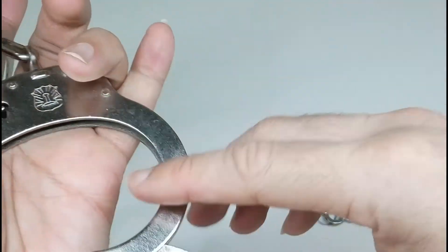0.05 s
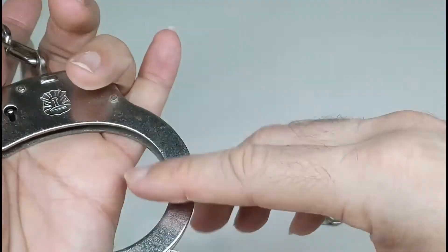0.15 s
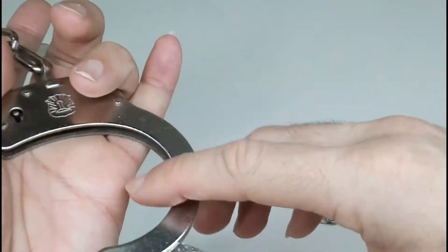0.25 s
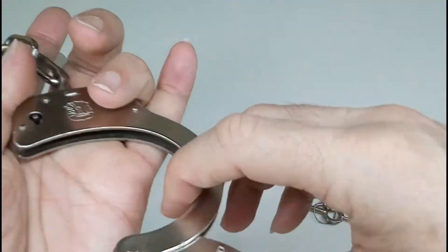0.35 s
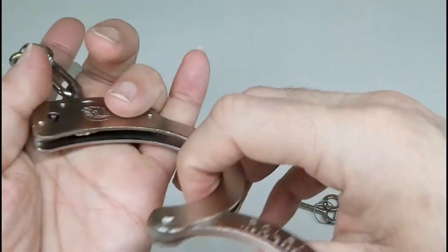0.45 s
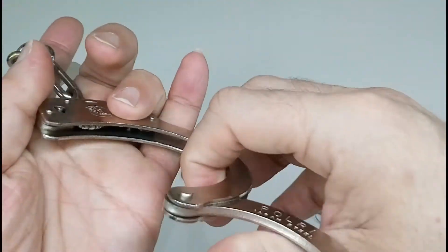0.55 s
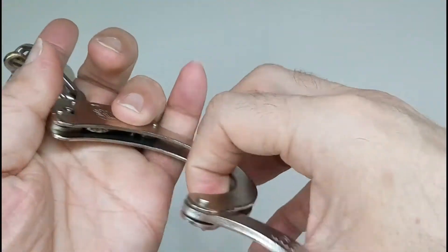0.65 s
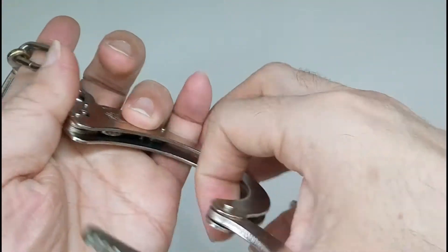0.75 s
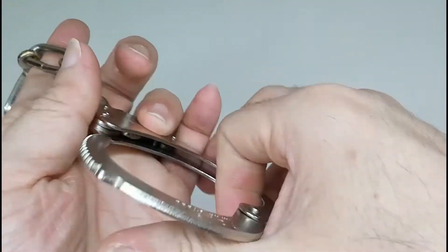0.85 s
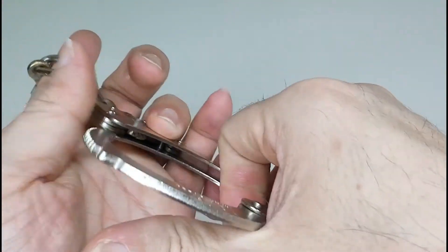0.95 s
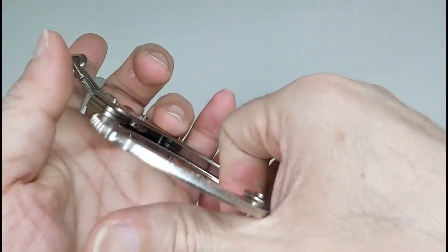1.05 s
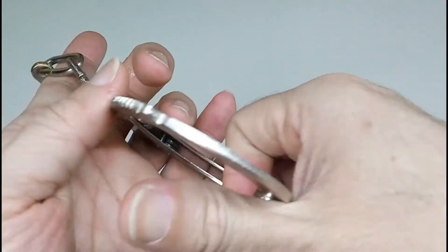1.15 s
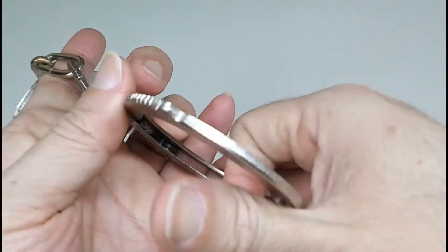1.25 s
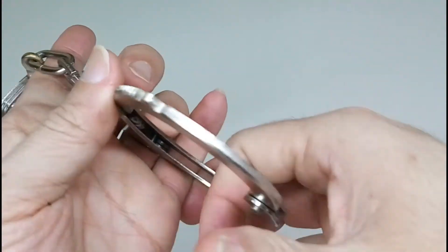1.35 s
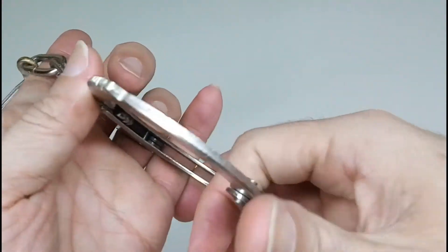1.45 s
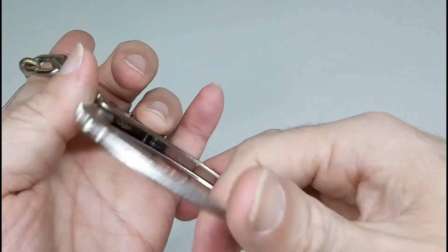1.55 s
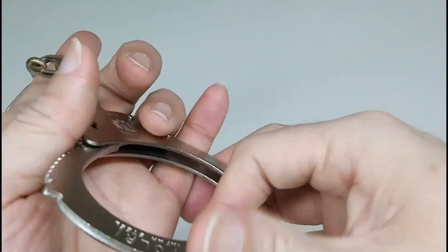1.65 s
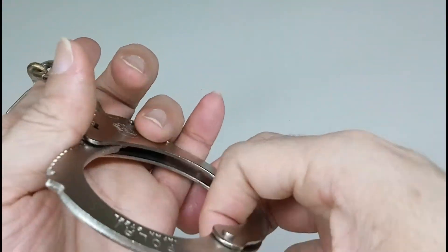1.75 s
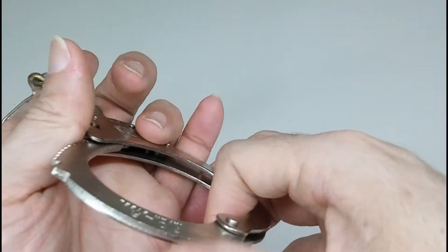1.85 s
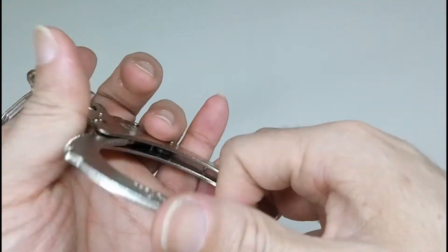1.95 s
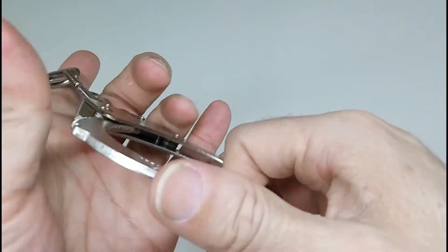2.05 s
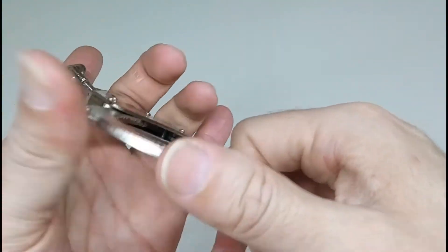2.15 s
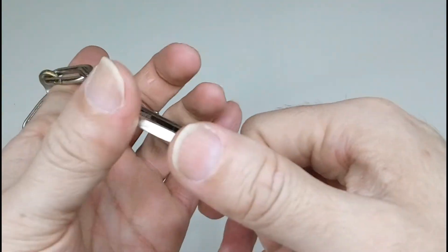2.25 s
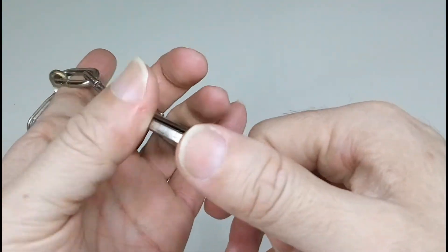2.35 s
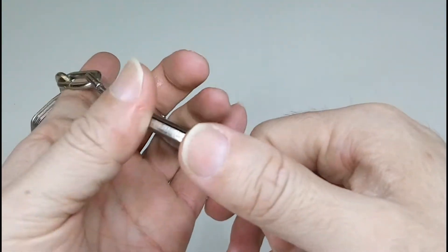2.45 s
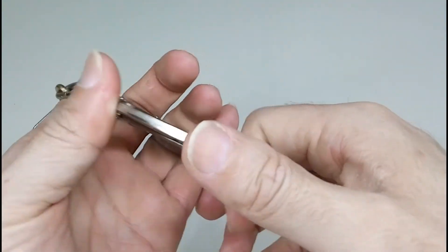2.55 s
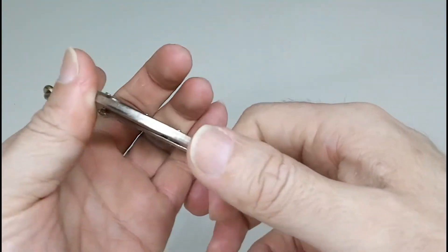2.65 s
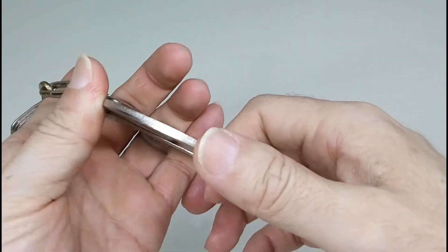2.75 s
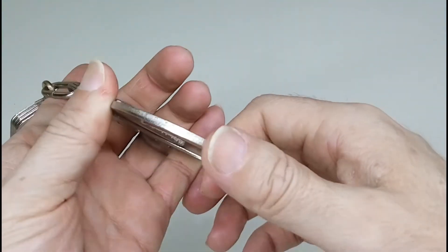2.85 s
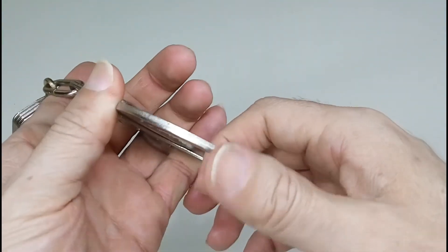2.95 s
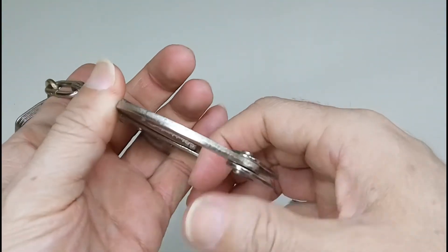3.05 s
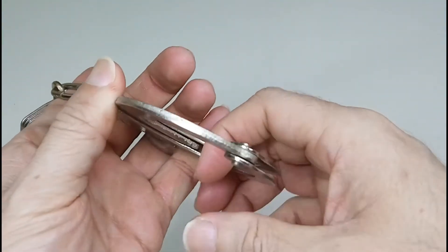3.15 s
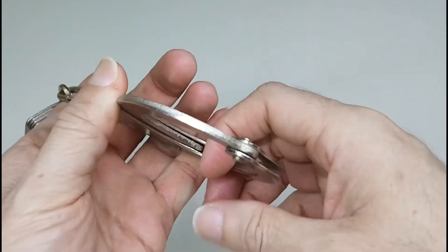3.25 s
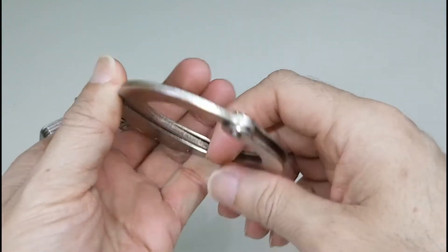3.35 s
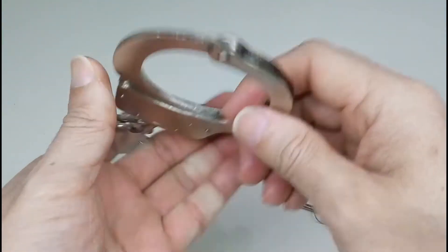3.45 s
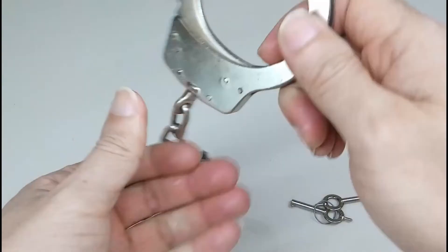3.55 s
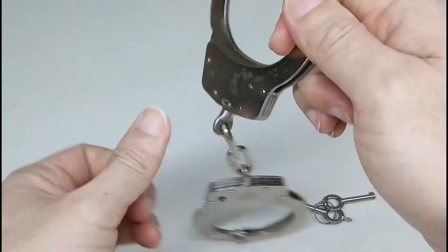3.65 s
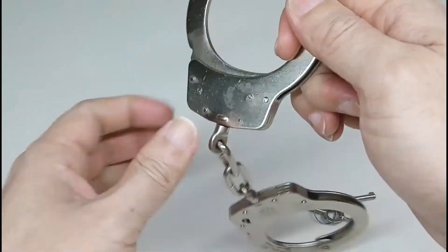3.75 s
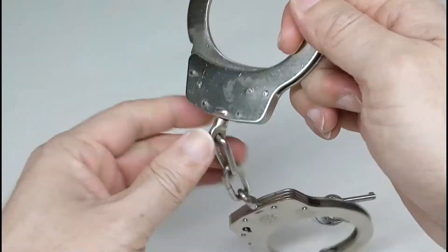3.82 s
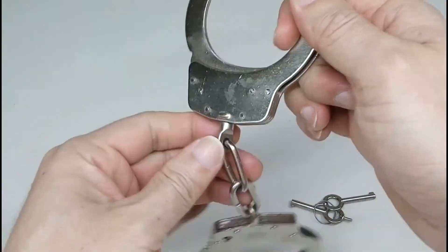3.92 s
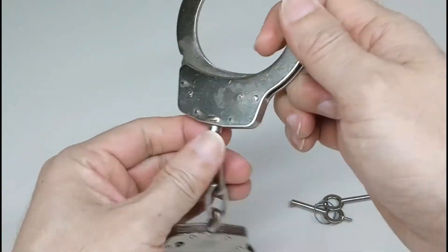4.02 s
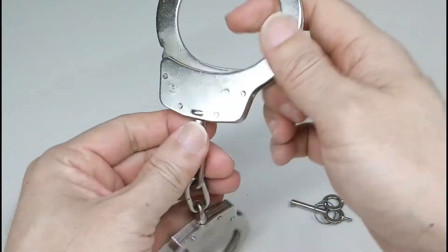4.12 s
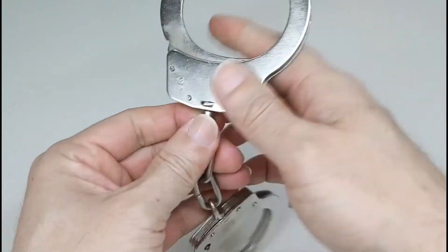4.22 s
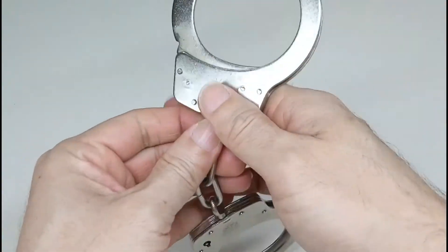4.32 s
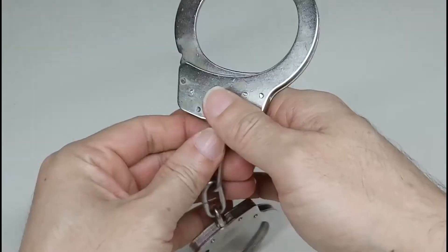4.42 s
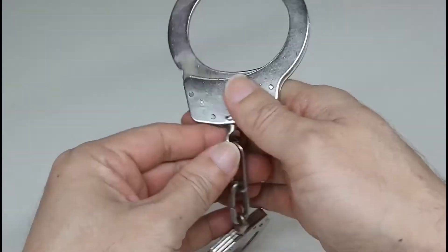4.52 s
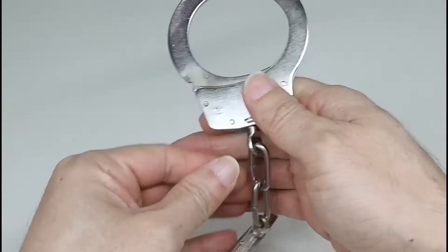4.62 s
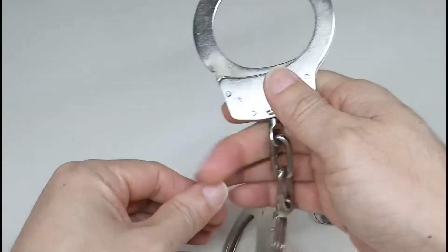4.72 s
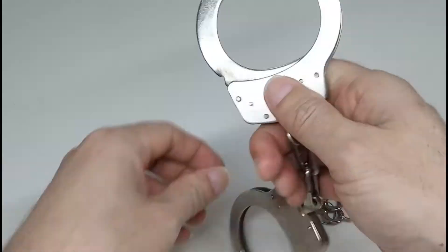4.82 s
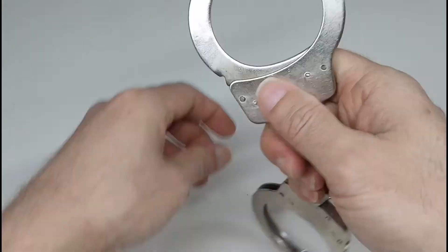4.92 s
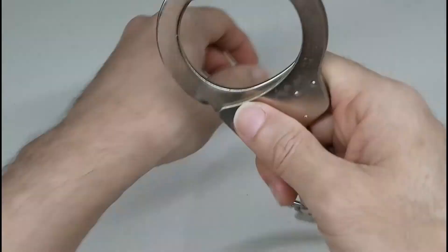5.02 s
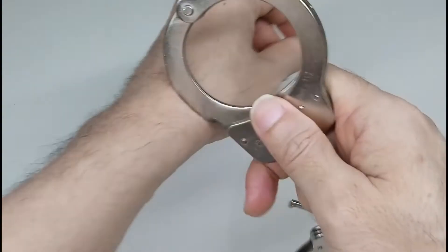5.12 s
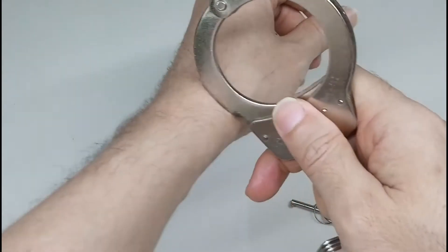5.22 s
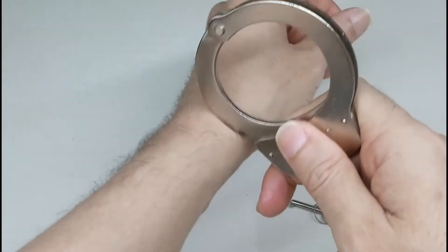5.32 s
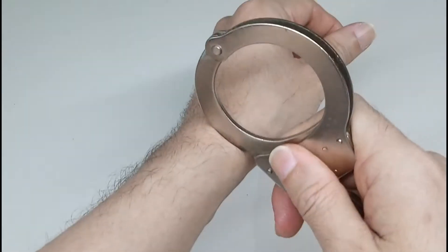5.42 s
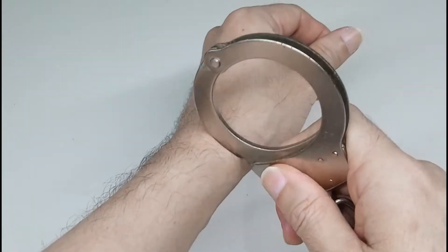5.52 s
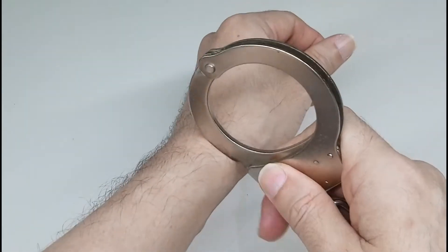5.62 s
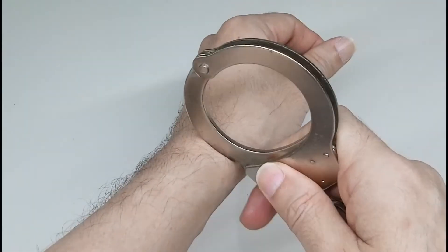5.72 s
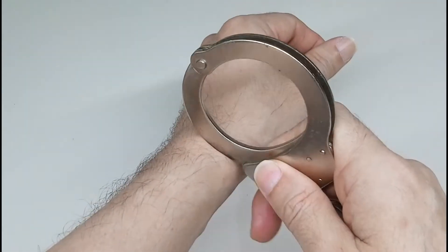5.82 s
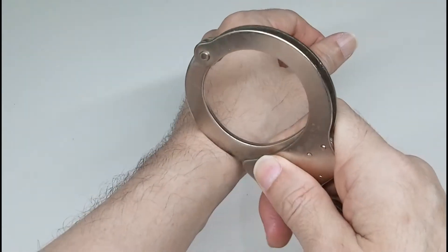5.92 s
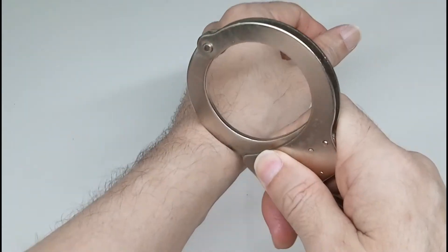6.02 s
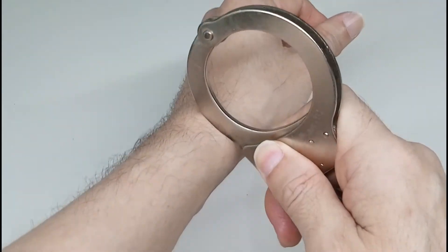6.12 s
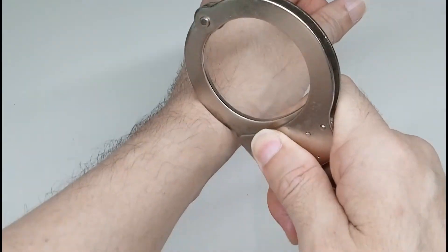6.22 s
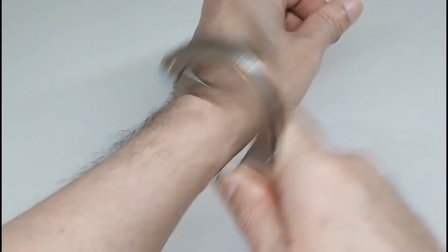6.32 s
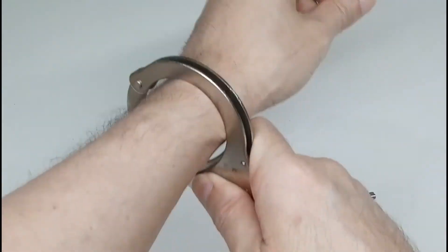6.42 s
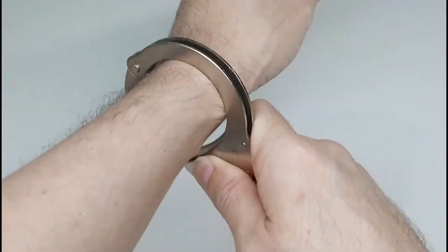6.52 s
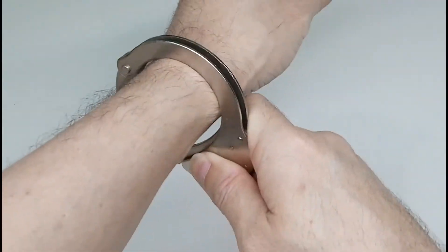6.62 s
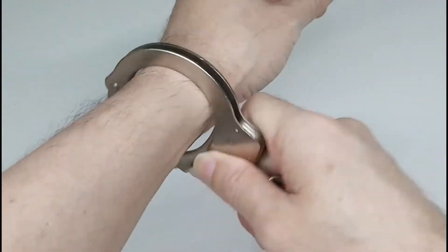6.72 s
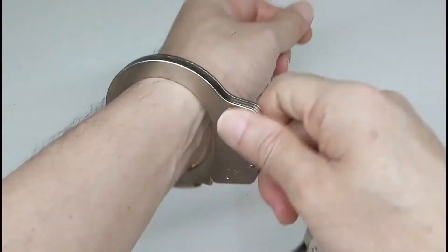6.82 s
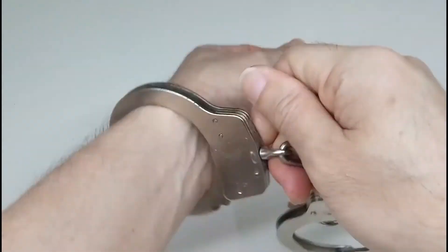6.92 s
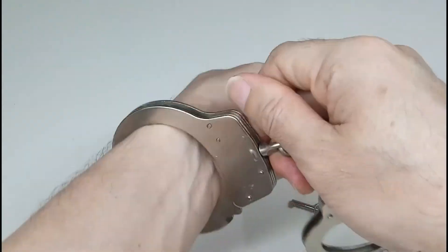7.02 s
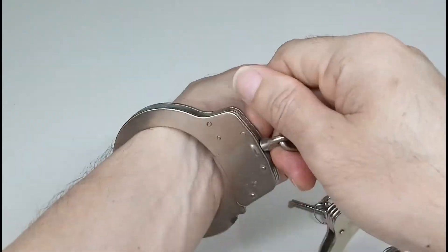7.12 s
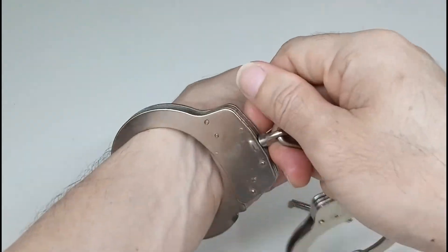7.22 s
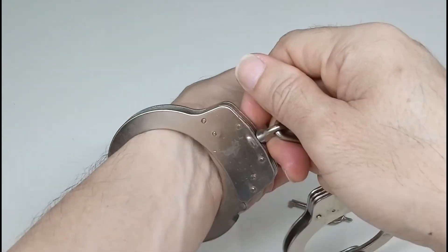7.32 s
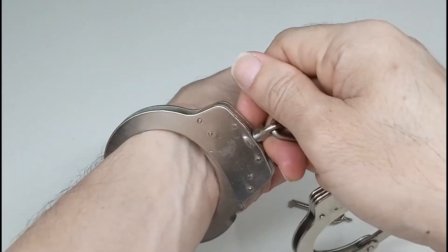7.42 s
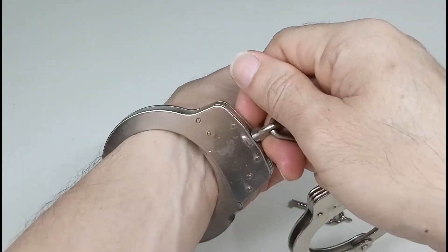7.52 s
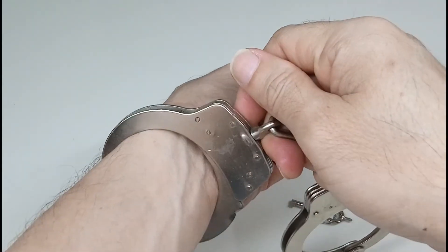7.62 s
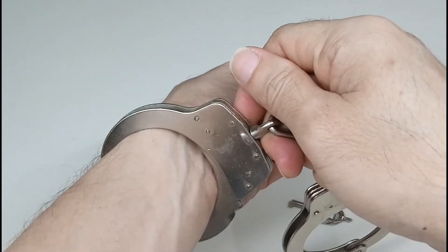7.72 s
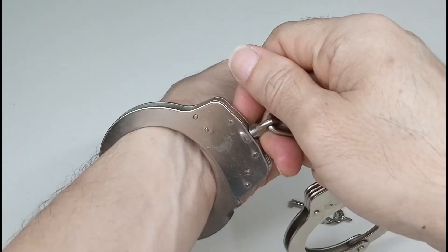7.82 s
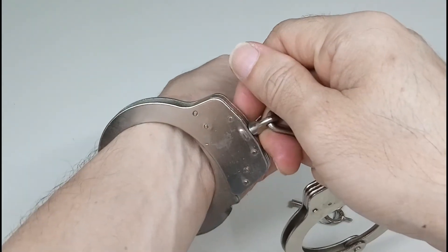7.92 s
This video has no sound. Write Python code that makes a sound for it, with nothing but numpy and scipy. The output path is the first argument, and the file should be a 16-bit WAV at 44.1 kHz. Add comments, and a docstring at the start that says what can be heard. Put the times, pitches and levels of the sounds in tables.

```python
"""Handcuffs over a table

A small room, the microphone close to a pair of steel handcuffs. The bow taps and scrapes,
then is pushed through the ratchet tooth by tooth. The chain clinks, and the bow swings
round a wrist and snaps shut. Each contact is a crack of noise plus the ring of steel modes.
Hands bump softly over steady fan noise and mains hum."""
import sys
import numpy as np
from scipy import signal
from scipy.fft import rfft, irfft
from scipy.io import wavfile

SR = 44100
rng = np.random.default_rng(int(sys.argv[2]) if len(sys.argv) > 2 else 0)


def master_out(mix):
    """Clip the mix to full scale and print it as 16-bit PCM to the path in sys.argv[1]."""
    frames = np.transpose(np.atleast_2d(mix))
    ceiling = np.clip(frames, -1, 1)
    pcm = np.round(ceiling * 32767).astype(np.int16)
    wavfile.write(sys.argv[1], SR, pcm)


N = 351477
BLOW_SPAN = .005 * SR  # a blow's level is its energy spread over 5 ms

# The cuff closing: the bow runs through the ratchet, swings round the wrist and latches.
# start_s, level_db, first_spot_hz, last_spot_hz, lift_db, tilt_db_per_octave, ring_db,
# grind_s, first_gap_s, step_db_per_contact, thud_db
CLOSING_KNOCKS = [(6.3431, -20, 5300, 4200, 1.5, -1.8, -10, 0.0029, .005, 0.6, -48),
                  (6.39, -18.5, 3770, 3790, 15, -4.5, -17, 0.00077, .0063, -3.4, -38),
                  (6.4257, -19, 2320, 3670, 10, -3.5, -10, 0.0005, .002, 1.25, -46)]


def undb(db):
    """Decibels to gain."""
    return 10 ** (np.asarray(db) / 20)


def level(x, db, span=None):
    """Scale x as if its energy, spread over span samples, had this rms level."""
    return x * undb(db) / np.sqrt(np.sum(x ** 2) / (span or len(x)))


def clock(seconds):
    """Time axis of a short sound."""
    return np.arange(int(seconds * SR)) / SR


def add(track, start_s, x):
    """Mix x into the track."""
    i = max(int(start_s * SR), 0)
    track[i:i + len(x)] += x[:N - i]


def fade(t, t60):
    """Free decay, 60 dB down after t60."""
    return np.exp(-np.log(1000) * t / t60)


def curve(points, f):
    """Gain in dB of a (Hz, dB) spectrum at the frequencies f."""
    hz, db = np.transpose(points)
    return np.interp(np.log(f), np.log(hz), db)


def treble_octaves(f):
    """Octaves above 1.5 kHz, zero below."""
    return np.log2(np.maximum(f / 1500, 1))


def colour(x, db_at, size=512):
    """Minimum-phase filter with the gain db_at(f), size samples long."""
    f = np.maximum(np.arange(size // 2 + 1) * SR / size, 1)
    cepstrum = irfft(np.log(undb(db_at(f))))
    cepstrum[1:size // 2] *= 2
    cepstrum[size // 2 + 1:] = 0
    return signal.oaconvolve(x, irfft(np.exp(rfft(cepstrum))))[:len(x)]


def fan_and_hum(waver=0.3):
    """Room tone: steady fan noise under a wavering mains hum and fan tone."""
    # Spectral shape of the fan and room air: frequency_hz, gain_db
    air_spectrum = [(20, -20), (40, -8), (62, 0), (100, 0), (140, -4.5), (205, 0), (245, -6), (480, -5),
                    (640, -7), (820, -6.5), (960, -11), (2000, -18), (3500, -24), (6500, -29), (8500, -35),
                    (16000, -37.5)]
    # Mains hum and fan tone: pitch_hz, level_db
    tones = [(99.9, -59.5), (285, -65)]
    t = np.arange(N) / SR
    out = level(colour(rng.standard_normal(N), lambda f: curve(air_spectrum, f), size=8192), db=-51.5)
    knots_s = np.linspace(0, t[-1], 40)
    for hz, db in tones:
        swell, drift = (np.interp(t, knots_s, row) for row in rng.standard_normal((2, len(knots_s))))
        out += np.sqrt(2) * undb(db) * (1 + waver * swell) * np.sin(2 * np.pi * hz * t + drift)
    return out


def thuds(width_octaves=0.53, slap_equal_db=-29):
    """Flesh pushes slowly: hand bumps and cushioned knocks swell and die in a few cycles."""
    # Soft bumps of hands and table: start_s, level_db, pitch_hz, length_s
    bumps = [(.01, -48, 68.5, .079), (3.017, -53, 66, 0.19), (3.413, -58, 85, .05),
             (3.609, -49.5, 92, 0.062), (4.189, -52, 60, 0.039), (4.25, -42, 93, .035),
             (4.295, -48.5, 105, .078), (4.379, -50, 64.5, 0.075), (4.961, -34, 78, .062)]
    # Dull body of a closing knock: pitch_hz, gain_db, length_s
    knock_body = [(199, 0.5, 0.017), (410, -1.5, 0.02), (880, -2.5, 0.028)]
    # each bump has a higher, shorter slap that grows with the square of the force
    slaps = [(start, 2 * db - slap_equal_db, hz * 1.96, length * .7) for start, db, hz, length in bumps]
    bodies = [(start, thud_db + db, hz, length)
              for start, *_, thud_db in CLOSING_KNOCKS for hz, db, length in knock_body]
    out, t = np.zeros(N), clock(.5)
    for start, db, hz, length in bumps + slaps + bodies:
        band = lambda f: -14 * np.log10(1 + (np.log2(f / hz) / width_octaves) ** 4)
        rumble = colour(rng.standard_normal(SR), band, size=4096)[-len(t):]
        envelope = t * np.exp(-4 * t / length)
        add(out, start, level(rumble * envelope, db, length * SR))
    return out


def crack(spot_hz, lift_db, tilt_db, grind_s, t60, spot_width, snap_db=3, snap_t60=0.0018):
    """Steel shakes crowded modes that the fingers damp at once; the struck spot rings above the rest."""
    # Spectrum of steel on steel: frequency_hz, gain_db
    steel = [(200, -21.5), (800, -19.5), (1300, -18), (1800, -9.5), (2700, -3), (3900, 2), (5400, 1),
             (7000, -5), (8400, -6.5), (9200, -6), (11500, -7.5), (13000, -11), (14700, -14.5),
             (15500, -6.5)]
    t = clock(1 / 16)
    decay = fade(t, t60) + undb(snap_db) * fade(t, snap_t60)
    attack = 1 - np.exp(-t / grind_s)  # a slow, grinding contact swallows the first snap
    burst = attack * decay * rng.standard_normal(len(t))
    spot = lambda f: lift_db / (1 + (np.log(f / spot_hz) / spot_width) ** 2)
    return colour(burst, lambda f: curve(steel, f) + spot(f) + tilt_db * treble_octaves(f))


def rings(modes, count, split=0.00318):
    """One ring a blow: riveted plates split every mode into a close pair that each blow mixes anew."""
    t = clock(.4)
    hz, db, t60 = np.repeat(modes, 2, axis=0).T[:, :, None]
    hz = hz * (1 + split * np.resize([-1, 1], hz.shape))
    angle = 2 * np.pi * hz * t
    envelope = undb(db) * fade(t, t60)
    phase = 2 * np.pi * rng.random((count, len(hz)))
    return np.cos(phase) @ (envelope * np.sin(angle)) + np.sin(phase) @ (envelope * np.cos(angle))


def strikes(blows, modes, crack_t60, spot_width):
    """Each blow cracks and sets the modes ringing; a harder contact favours the high modes."""
    out = np.zeros(N)
    for blow, ring in zip(blows, rings(modes, len(blows))):
        start, db, spot_hz, lift_db, tilt_db, ring_db, grind_s = blow  # tilt is per octave
        contact = crack(spot_hz, lift_db, tilt_db, grind_s, crack_t60, spot_width)
        ring = colour(ring, lambda f: 1.1 * tilt_db * treble_octaves(f))
        add(out, start, level(contact, db, BLOW_SPAN))
        add(out, start, level(ring, db + ring_db, BLOW_SPAN))
    return out


def bow_taps(lift_db=10.5, ring_db=-18):
    """The bow taps the frame as the cuff is turned, and the side plates clack hollowly with it."""
    # Taps: start_s, level_db, spot_hz, tilt_db_per_octave, plate_db
    taps = [(.7597, -56, 6100, -5, -12), (.804, -52.5, 6000, -6, -8), (0.8689, -32.5, 8700, -0.5, 1),
            (0.875, -38, 4900, 4, -10), (1.24, -46.5, 5200, -1, -4.5), (1.276, -54, 5740, -1, -12),
            (1.5817, -46.5, 5160, 0.5, -12), (1.6349, -42.5, 5240, 0, -6.5), (6.81, -59, 4500, -3, -12),
            (6.956, -52, 4640, -3.5, -14)]
    plate_hz, plate_lift_db, plate_tilt_db, plate_ring_db = 1690, 13.5, -6, -33
    blows = []
    for start, db, spot_hz, tilt_db, plate_db in taps:
        grind_s = 0.0009 * undb(-50 - db)  # harder taps bite sooner
        blows += [(start, db, spot_hz, lift_db, tilt_db, ring_db, grind_s),
                  (start, db + plate_db, plate_hz, plate_lift_db, plate_tilt_db, plate_ring_db, grind_s)]
    return blows


def bow_scrapes(pawl_hz=5170, width_hz=380, grain_db=6):
    """Tiny uneven slips of steel on steel ring the pawl."""
    # The bow sliding over the pawl: start_s, length_s, level_db
    slides = [(1.584, 0.052, -55.5), (2.317, 0.031, -58.5)]
    pawl_band = lambda f: -10 * np.log10(1 + ((f - pawl_hz) / width_hz) ** 4)
    out = np.zeros(N)
    for start, length, db in slides:
        n = int(length * SR)
        noise, roughness = rng.standard_normal((2, SR))[:, :n]
        slips = noise * undb(grain_db * roughness) * signal.windows.tukey(n)
        add(out, start, level(colour(slips, pawl_band), db))
    return out


def ratchet(tilt_db=0, ring_db=-30):
    """At every tooth the pawl slips off the tip and drops into the notch: a double click."""
    # Ratchet teeth, the first two in one push: start_s, level_db, tip_hz, pawl_hz, lift_db, drop_s
    teeth = [(2.3631, -21, 2640, 5040, 12.5, .0055), (2.3745, -22.5, 5200, 5100, 13, .007),
             (2.733, -21, 4530, 4600, 10, .007), (2.8311, -22, 3800, 5040, 7, .0064),
             (2.979, -22.5, 4600, 5380, 6, 0.01)]
    slip_db, slip_lift_db = -2, 6.5
    slip_grind_s, landing_grind_s = 0.00077, 0.00082
    blows = []
    for start, db, tip_hz, pawl_hz, lift_db, drop_s in teeth:
        blows += [(start, db + slip_db, tip_hz, slip_lift_db, tilt_db, ring_db, slip_grind_s),
                  (start + drop_s, db, pawl_hz, lift_db, tilt_db, ring_db, landing_grind_s)]
    return blows


def pawl_spring(blows, spring_db=-10, reach_hz=330):
    """Blows that land near the pitch of the pawl spring leave it singing."""
    # Modes of the spring: pitch_hz, gain_db, t60_s
    spring_modes = [(4670, -9, .2), (4920, -3.5, 0.13), (5030, 1, 0.18), (5170, -.5, 0.16),
                    (5600, -12, .25), (11450, -10, .21), (15100, -15, .16)]
    strongest_hz = spring_modes[2][0]
    out = np.zeros(N)
    for (start, db, spot_hz, *_), ring in zip(blows, rings(spring_modes, len(blows))):
        coupling = 1 / (1 + ((spot_hz - strongest_hz) / reach_hz) ** 2)
        add(out, start, coupling * level(ring, db + spring_db, BLOW_SPAN))
    return out


def chain_clinks(tilt_db=-7, ring_db=-8.5, grind_s=0.00037):
    """Each link hits its neighbour once, short and clean; small free links ring in a narrow band."""
    # Links knocking together: start_s, level_db, spot_hz, lift_db
    clinks = [(3.7031, -56.5, 3980, 9), (3.8988, -53.5, 4870, 14), (3.995, -58.5, 5000, 2),
              (4.194, -58.5, 3000, 4), (4.4753, -45, 3970, 7), (4.5977, -46.5, 4020, 16),
              (4.82, -39, 4200, 21.5), (5.738, -57.5, 4200, 8)]
    # Modes of the hanging chain and second cuff: pitch_hz, gain_db, t60_s
    chain_modes = [(2260, -12, 0.52), (2460, -18, .4), (3260, -12, 0.43), (4050, 1, .16), (4180, 3.5, .14),
                   (4500, -12, .4), (6702, -6, .3)]
    blows = [(*clink, tilt_db, ring_db, grind_s) for clink in clinks]
    return strikes(blows, chain_modes, crack_t60=0.042, spot_width=0.052)


def snap_shut(contacts=3, gap_growth=1.45, brighten_db=2):
    """The bow chatters at widening gaps, brighter each time, as the point of contact slides along it."""
    blows = []
    for knock in CLOSING_KNOCKS:
        start, db, first_hz, last_hz, lift_db, tilt_db, ring_db, grind_s, gap_s, step_db, _ = knock
        for k, spot_hz in enumerate(np.geomspace(first_hz, last_hz, contacts)):
            contact_s = start + gap_s * k ** gap_growth
            contact_tilt_db = tilt_db + k * brighten_db
            blows.append((contact_s, db + k * step_db, spot_hz, lift_db, contact_tilt_db, ring_db, grind_s))
    return blows


def room(x, table_s=.0021, wall_s=.0075, crossover_hz=7000):
    """The table and the nearest wall answer first, then a short tail whose treble dies a little sooner."""
    t = clock(.5)
    early, late = rng.standard_normal((2, len(t)))
    lows = signal.sosfilt(signal.butter(2, crossover_hz, "low", fs=SR, output="sos"), late)
    highs = signal.sosfilt(signal.butter(2, crossover_hz, "high", fs=SR, output="sos"), late)
    tail = lows * fade(t, t60=0.37) - highs * fade(t, t60=0.35)
    response = np.zeros(SR)
    add(response, table_s, undb([-10]))
    add(response, wall_s, level(early * fade(t, t60=0.052), db=-12, span=1))
    add(response, wall_s, level(tail, db=-12.5, span=0.88))
    return x + signal.fftconvolve(x, response)[:N]


def scene():
    """Cuff and chain sound in the room, over dry thuds and room tone; mono."""
    # Modes of the cuff frame: pitch_hz, gain_db, t60_s
    frame_modes = [(2700, -9, .19), (3190, -15, .21), (3672, 3.5, 0.31), (3610, -2, 0.37),
                   (3760, -1.5, 0.37), (4090, -6, 0.35), (4100, -9, .28), (5170, -2, 0.28),
                   (5560, -11, .22), (7290, -4, 0.29), (7700, -14, .2), (9200, -3, 0.25), (11570, -16, .22),
                   (13650, -8, .22), (14850, -13, .22)]
    clicks = ratchet()
    frame = strikes(bow_taps() + clicks + snap_shut(), frame_modes, crack_t60=0.036, spot_width=0.096)
    cuff = frame + pawl_spring(clicks) + bow_scrapes()
    return (room(cuff + chain_clinks()) + thuds() + fan_and_hum())[None]


def record(dry, top_hz=16200):
    """The close microphone colours the treble, and the top is cut."""
    # Microphone response, with a port resonance in the top octave: frequency_hz, gain_db
    microphone = [(20, -0.5), (6700, -0.5), (8000, -8), (13700, -6.5), (14400, 1), (15000, 5.5), (15350, 3),
                  (15700, -26.5)]
    heard = np.array([colour(channel, lambda f: curve(microphone, f)) for channel in dry])
    return signal.sosfilt(signal.ellip(8, .2, 70, top_hz, fs=SR, output="sos"), heard)


dry = scene()
out = record(dry)
master_out(out)
```